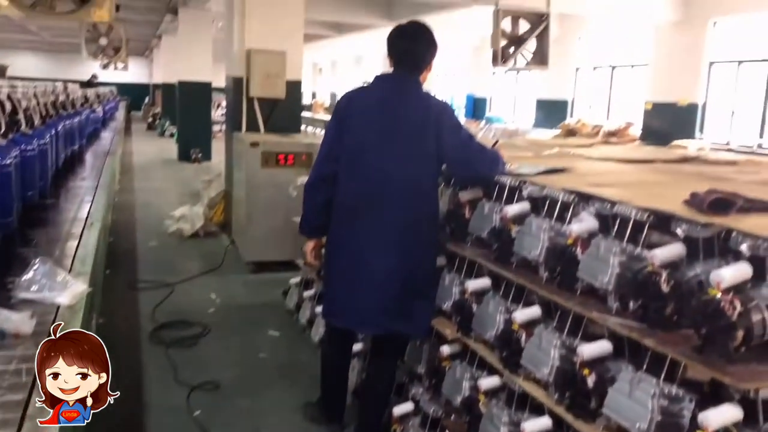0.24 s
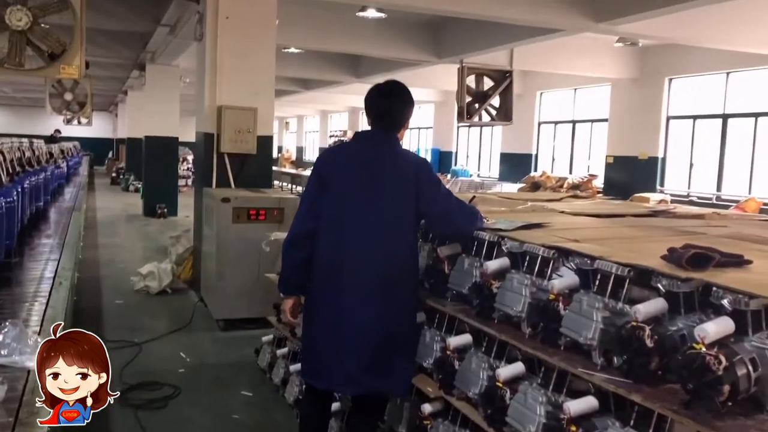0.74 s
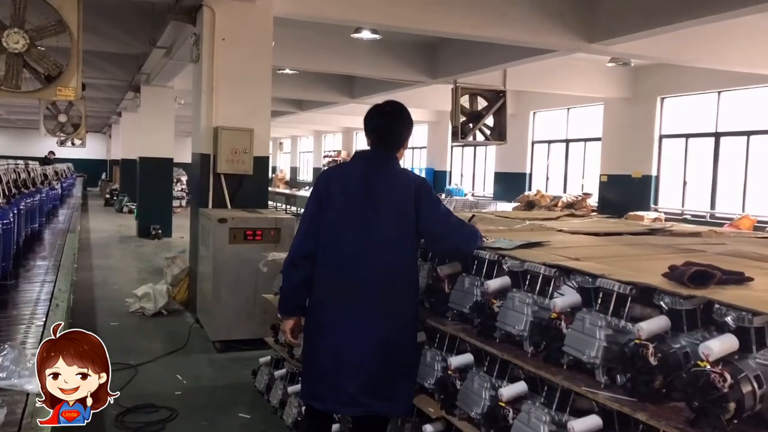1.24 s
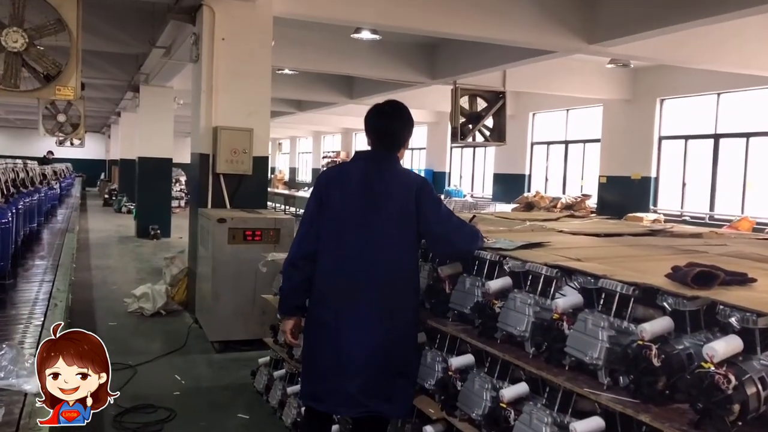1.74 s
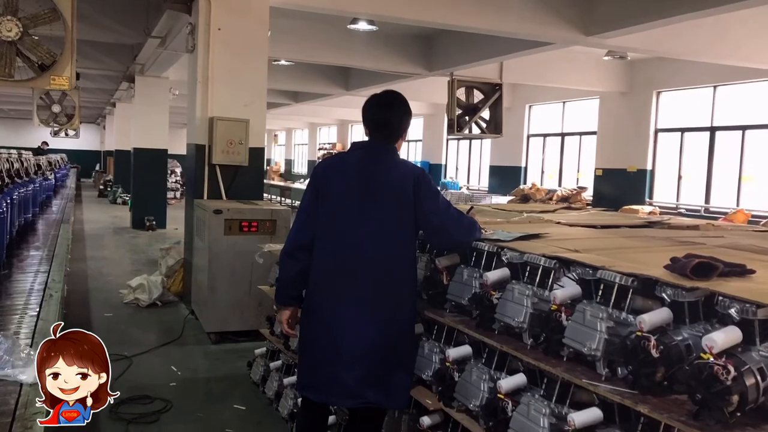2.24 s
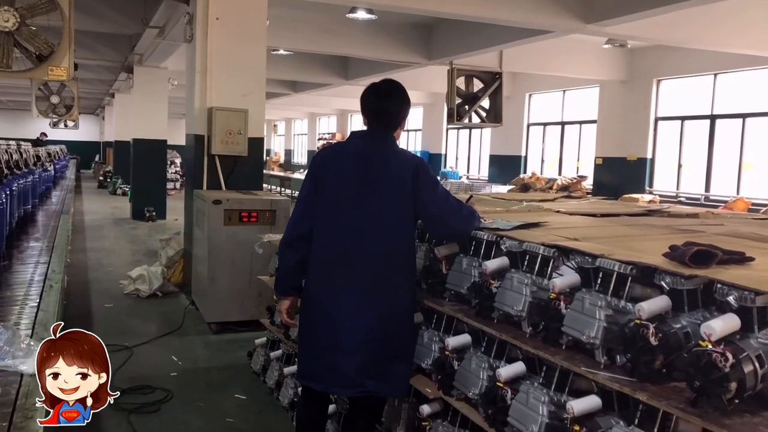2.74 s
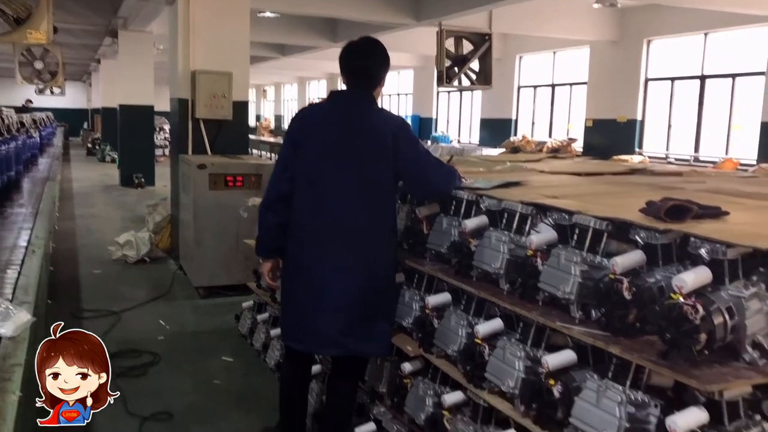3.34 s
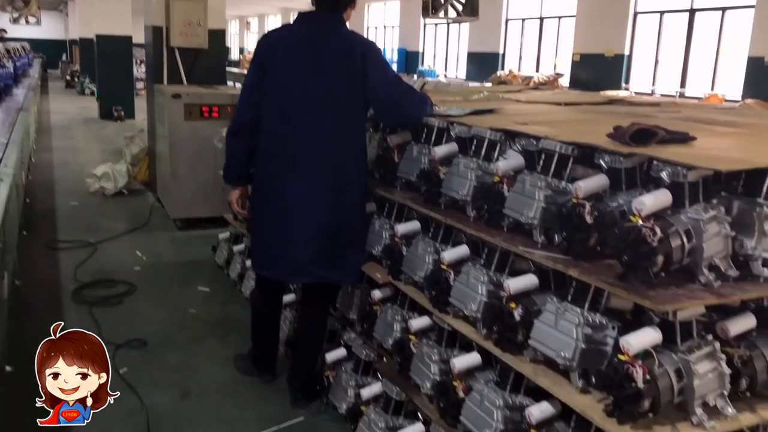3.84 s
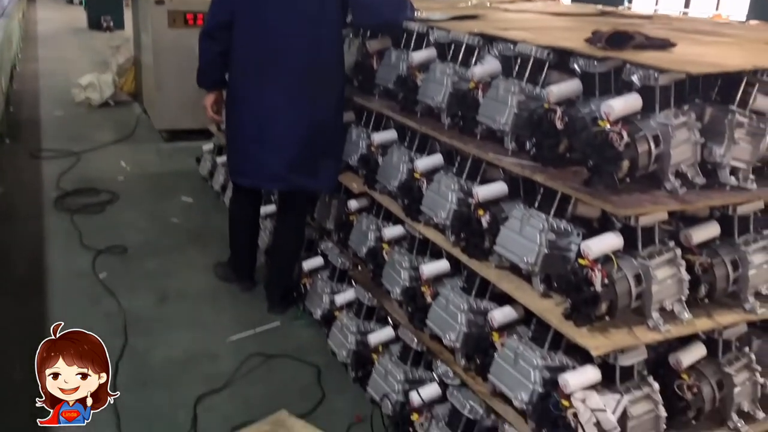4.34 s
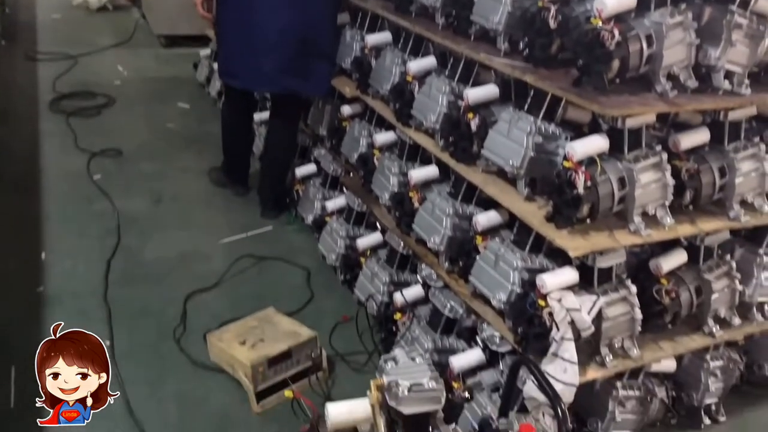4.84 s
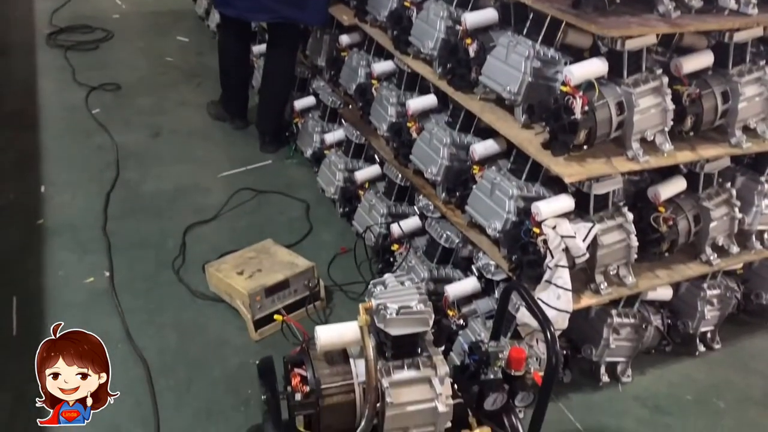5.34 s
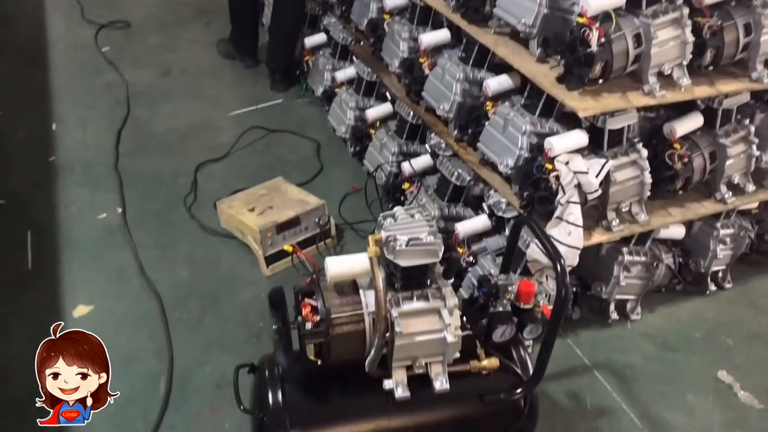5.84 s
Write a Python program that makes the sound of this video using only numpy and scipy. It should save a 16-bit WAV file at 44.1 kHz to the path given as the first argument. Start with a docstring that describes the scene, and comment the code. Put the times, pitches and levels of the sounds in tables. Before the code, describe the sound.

From 0 s a small piston compressor is already running at full speed on a hard factory floor, and it never pauses. About forty-three strokes per second fuse into a rough, thumping drone, strongest in the low-mids to around 800 Hz, with raspy air pulses. Over it lies a dense metallic clatter of valve ticks, hiss and ringing casing, with short floor and rack reflections. Thin, very high squeaks flicker in short bursts, mainly between 0.6 and 4 s. The microphone draws slightly away until 3 s; two harder knocks land near 3.1 and 3.3 s. From 3 to 4.5 s it moves in, and by 5 s it looks down on the cylinder head: slightly louder, with altered metallic ringing. The pitch sags almost imperceptibly as load builds. Fan wash, mains hum and a distant motor swelling near 0.3 and 3.5 s stay very faint. It ends still running.

```python
"""First heard: the fast thumping hum and clatter of a small piston air compressor on a factory floor.
The microphone moves closer after about three seconds. Each crank turn drives a stack of hum orders, a rasp
of air-shaped noise through resonators, and valve ticks and hiss that ring the metal casing; some strokes squeak.
Behind: filtered-noise wash of fan and hall, a weak mains tone, a faint far motor as a gliding sine."""
import sys
import numpy as np
from scipy import signal
from scipy.fft import rfft, irfft
from scipy.io import wavfile
from scipy.ndimage import uniform_filter1d

SR = 44100
rng = np.random.default_rng(int(sys.argv[2]) if len(sys.argv) > 2 else 0)


def unload_audio(sound):
    """Save the sound as a 16-bit wav file, at the path given as the first command line argument."""
    columns = np.transpose(np.atleast_2d(sound))
    # keep every value between -1 and 1, then stretch to whole-number steps
    steps = np.round(np.clip(columns, -1, 1) * 32767)
    wavfile.write(sys.argv[1], SR, steps.astype(np.int16))


N = 267951
TIME_S = np.arange(N) / SR

# walk of the microphone: (time [s], nearness [0-1], look down on cylinder head [0-1])
WALK = [(0, 0.3, 0.23), (.8, 0.14, 0.22), (2.9, .05, 0), (3.9, 0.67, 0.3), (4.5, 1, 0.5), (4.9, 0.9, .98)]
# low crank orders heard from far: (order [x crank speed], relative level [dB])
HUM_ORDERS_FAR = [(1, -27.5), (2, -13.5), (3, -40), (4, -18.5), (5, -20.5), (6, -1.5), (7, -6), (8, -5.5),
                  (9, -12), (10, -5.5), (11, -19), (12, -7.5), (13, -22.5), (14, -14.5), (15, -3.5),
                  (16, -6), (17, -11), (18, -1), (19, 0), (20, -12.5), (21, -10)]
# low crank orders heard from near: (order [x crank speed], relative level [dB])
HUM_ORDERS_NEAR = [(1, -26), (2, -13), (3, -27), (4, -19), (5, -18), (6, -2), (7, -5.5), (8, -5), (9, -14),
                   (10, -5), (11, -12), (12, -19.5), (13, -14), (14, -13.5), (15, -2), (16, -2.5),
                   (17, -20), (18, -3), (19, 1.5), (20, -8.5), (21, -6)]
# air pulses that set the phases of the orders: (place [turns], centre [Hz], width [Hz], weight [dB])
AIR_PULSES = [(0.135, 450, 510, -3), (0.183, 1080, 90, -6), (0.461, 580, 170, -3), (0.574, 1400, 70, -22),
              (0.685, 240, 60, 1), (0.821, 490, 670, -11), (0.897, 900, 530, -4), (0.912, 1060, 300, -4)]
# air flow over one turn: (place [turns], hiss [dB], rasp [dB])
AIR_FLOW = [(.02, -11.5, -4.5), (.15, -3, 0.5), (.3, -3.5, 2), (.43, -3.5, 3), (.58, -5.5, -1),
            (.7, -4, -9.5), (.85, -5, -3.5), (.89, -8, -2)]
# air passages rung by the rasp: (centre [Hz], width [Hz], level [dB])
AIR_PASSAGES = [(807, 94, 3.5), (735, 96, -10), (1414, 63, -2.5)]
# cylinder head resonances: (centre [Hz], width [Hz], far level [dB], near level [dB])
HEAD_MODES = [(1042, 20, -10, -28), (1084, 13, -26, -9), (1129, 15, -7.5, -37), (1216, 14, -9.5, -21),
              (1259, 38, -9, -8.5), (1392, 38, -12, -12.5), (1476, 20, -20, -16.5), (1554.6, 40, -8.5, -5),
              (2172, 30, -31, -18)]
# hall standing waves crossed by the microphone: (time [s], centre [Hz], peak or dip [dB])
STANDING_WAVES = [(.1, 259, -2.5), (.1, 842, 3.5), (.15, 678, -9.5), (2.2, 1504, 14), (3.05, 651, -4),
                  (3.1, 1565, -5.5), (3.2, 312, -7.5), (4.4, 518, -10), (4.199, 362, 3.5), (6, 436, -4.5)]
# valve and piston ticks: (place [turns], level before scatter [dB])
VALVE_TICKS = [(0.87, -0.5), (.905, 2), (0.944, 0), (0.981, -2), (.03, 6), (0.131, -2.5), (.3, -1),
               (.72, -1)]
# harder piston knocks: (time [s], level [dB])
PISTON_KNOCKS = [(3.145, 8), (3.306, 6)]
# broad clatter spectrum: (frequency [Hz], far density [dB per Hz], near density [dB per Hz])
CLATTER_SPECTRUM = [(404, -10.5, -24), (1100, -2, -4), (1620, 2, 0.5), (2150, -1.5, 0), (2940, -3, -2.5),
                    (4080, 4, 3), (4650, -1.5, 0), (6400, -1.5, -1.5), (8500, -1.5, -2), (9700, -7, -4.5),
                    (13000, -8.5, -5), (15800, -6.5, -2.5)]
# casing modes: (centre [Hz], width [Hz], far lift [dB], near lift [dB])
CASING_MODES = [(3120, 46, 3, 6), (3560, 87, 1.5, 7.5), (4090, 38, -5, 7.5), (5330, 64, 7, 0),
                (5970, 78, 9, 9), (6640, 85, -4.5, 8.5), (6710, 39, 11, 6), (7910, 40, 8, 1),
                (9140, 130, 7, 6.5), (9200, 53, -4, -3), (10100, 90, 5, 4.5), (11400, 130, 7.5, -3),
                (14400, 400, 6, 1.5)]
# reeds and rubbing parts, rung once a turn:
# (place [turns], decay length [turns], centre [Hz], width [Hz], far level [dB], near level [dB])
REED_RINGS = [(0.8, 0.097, 5330, 123, -12, -15.5), (.87, 0.086, 6880, 77, -11.5, -21.5),
              (.865, 0.21, 9060, 1200, -20.5, -10.5), (0.5, 0.17, 9540, 57, -16, -26),
              (.93, 0.12, 4060, 270, -22, -18.5), (.88, 0.16, 6300, 360, -19, -15.5),
              (0.03, 0.13, 7900, 45, -30, -11.5), (0.02, 0.22, 3610, 44, -18.5, -14),
              (.87, 0.086, 10900, 2000, -18.5, -18)]
# spells of strong valve squeak: (start [s], end [s])
SQUEAK_SPELLS = [(0.619, 0.69), (.81, .89), (1.33, 1.4), (1.8, 1.95), (2.0, 2.2), (2.3, 2.54), (2.62, 2.77),
                 (2.9, 3), (3.22, 3.2), (3.82, 4)]
# fan and hall spectrum: (frequency [Hz], density [dB per Hz])
WASH_SPECTRUM = [(20, -22), (32, -12), (55, 3.5), (100, -0.5), (130, 0.5), (260, 2), (400, 3.5),
                 (550, -1.5), (1000, 4), (2000, -4), (6000, -11), (16000, -37)]
# far motor: (time of top speed [s], top frequency [Hz], level at top speed [dB])
FAR_MOTOR_RUNS = [(.3, 272, -40), (3.521, 256.6, -36)]

# crank slows steadily as the tank fills
START_TURN, START_TURNS_PER_S, SAG_TURNS_PER_S2 = .041, 43.599, .0545
LOAD_S = 2.3  # time constant of the pump load
# base level, rise at full nearness, rise at full load
PUMP_DB, PUMP_NEAR_DB, PUMP_LOAD_DB = -16.5, 2.5, 1.3
CLATTER_DB, CLATTER_NEAR_DB, CLATTER_LOAD_DB = -22.5, 0.5, 2.06
# slope of the higher orders; they also grow with load
UPPER_HZ, UPPER_DB, UPPER_DB_PER_OCTAVE, UPPER_LOAD_DB = 944, -23, -10, 6
NODE_S, NODE_HZ = 0.66, 25.3  # extent of a standing wave to 1/e of its dB
# squeak levels before uneven strokes and mix; faint squeaks come by chance around a centre time
STRONG_SQUEAK_DB, FAINT_SQUEAK_DB = -32.5, -34.5
FAINT_SQUEAK_S, FAINT_SQUEAK_SPREAD_S = 2.3, 1.8
MOTOR_OCTAVES_PER_S, MOTOR_FADE_DB_PER_S = .5, 16
MAINS_HZ, EDGE_HZ = 100, 15780


def amp(db):
    """Decibels to gain."""
    return 10 ** (np.asarray(db) / 20)


def unit(x):
    """Scales to rms 1."""
    return x / np.sqrt(np.mean(x ** 2) + 1e-20)


def curve(rows, column=1):
    """One column of a time table at every sample."""
    rows = np.asarray(rows)
    return np.interp(TIME_S, rows[:, 0], rows[:, column])


def colour(rows, hz, column=1):
    """One column of a spectrum table as gain at hz, interpolated over log frequency."""
    rows = np.asarray(rows)
    return amp(np.interp(np.log(hz + 1), np.log(rows[:, 0]), rows[:, column]))


def drift(rate_hz):
    """Random wander: low-passed noise, scaled to rms 1 over about 20 s."""
    count, grid_hz = 4096, 200
    hz = np.fft.rfftfreq(count, 1 / grid_hz)
    spectrum = rfft(rng.standard_normal(count)) / (1 + (hz / rate_hz) ** 2)
    slow = unit(irfft(spectrum))
    return np.interp(TIME_S * grid_hz, np.arange(len(slow)), slow)


def resonate(x, hz, width_hz):
    """One-pole complex resonance of about gain 1 at its centre."""
    r = np.exp(-np.pi * width_hz / SR)
    return 2 * signal.lfilter([1 - r], [1, -r * np.exp(2j * np.pi * hz / SR)], x).real


def steady(x, firmness):
    """Self-limiting vibration: evens out power smoothed over turns."""
    turn_samples = int(SR / np.mean(speed_turns_per_s()))
    power = uniform_filter1d(uniform_filter1d(x ** 2, turn_samples), turn_samples)
    return unit(x / (abs(power) + 1e-12) ** (firmness / 2))


def speed_turns_per_s():
    """Crank speed at every sample, falling linearly."""
    return START_TURNS_PER_S - SAG_TURNS_PER_S2 * TIME_S


def air_flow(turns, column):
    """Gain of the air flow at the crank's present place."""
    rows = np.asarray(AIR_FLOW)
    return amp(np.interp(turns, rows[:, 0], rows[:, column], period=1))


def pass_times_s(turns, place):
    """Times at which the crank passes one place in its turn."""
    whole_turns = np.arange(np.ceil(turns[0] - place), turns[-1] - place)
    return np.interp(whole_turns + place, turns, TIME_S)


def clicks(times_s, sizes):
    """Train of single-sample clicks."""
    samples = np.clip(np.round(times_s * SR).astype(int), 0, N - 1)
    return np.bincount(samples, sizes, N)


def order_gains(low, column, count=55):
    """Low orders from their table; higher ones from a falling slope plus cylinder head resonances."""
    hz = np.arange(len(low) + 1, count + 1) * np.mean(speed_turns_per_s())
    slope = amp(UPPER_DB + UPPER_DB_PER_OCTAVE * np.log2(hz / UPPER_HZ))
    rung = sum(amp(row[column + 1]) / (1 + (2 * (hz - row[0]) / row[1]) ** 2) for row in HEAD_MODES)
    return np.concatenate([amp(np.transpose(low)[1]), np.hypot(slope, rung)])


def standing_wave_gain(hz):
    """Gain of one tone over time as the microphone crosses standing waves near its frequency."""
    t = TIME_S[::SR // 100]
    gain_db = sum(db * np.exp(-((t - s) / NODE_S) ** 2 - ((hz - centre) / NODE_HZ) ** 2)
                  for s, centre, db in STANDING_WAVES)
    return np.interp(TIME_S, t, amp(gain_db))


def hum(turns, near, load, wander_db=3.4, shake_db=0.17, wobble_turns=0.00082,
        beat_hz=41.0, beat_depth=0.051, beat_width_hz=90, beat_slip_rad=1.0):
    """Air pulses repeat each turn, forming crank orders whose balance shifts with listening place."""
    far_gain, near_gain = order_gains(HUM_ORDERS_FAR, column=1), order_gains(HUM_ORDERS_NEAR, column=2)
    order = np.arange(1, len(far_gain) + 1)
    hz = order * np.mean(speed_turns_per_s())
    # each order takes its phase from the pulses near its frequency
    pulse_sum = sum(amp(db) / (1 + (2 * (hz - centre) / width) ** 2) * np.exp(-2j * np.pi * order * place)
                    for place, centre, width, db in AIR_PULSES)
    phase_rad = np.angle(pulse_sum)
    crank_rad = 2 * np.pi * (turns + wobble_turns * drift(rate_hz=33))
    # orders near the first air passage flutter
    beating = np.cos(2 * np.pi * beat_hz * TIME_S + beat_slip_rad * drift(rate_hz=0.81))
    depth = beat_depth / (1 + (2 * (hz - AIR_PASSAGES[0][0]) / beat_width_hz) ** 2)
    out = np.zeros(N)
    for k, f, far, close, lag, share in zip(order, hz, far_gain, near_gain, phase_rad, depth):
        # short waves shift most as the microphone sways
        wander = amp(wander_db * k / len(order) * drift(rate_hz=0.091))
        strain = amp(UPPER_LOAD_DB * (load - 1)) if k > len(HUM_ORDERS_FAR) else 1
        place_gain = far + (close - far) * near
        gain = place_gain * strain * standing_wave_gain(f) * wander * (1 + share * beating)
        out += gain * np.cos(k * crank_rad + lag)
    levelled = unit(out / np.sqrt(uniform_filter1d(out ** 2, SR // 2)))
    return levelled * amp(shake_db * drift(rate_hz=24))


def rasp(turns, rebound=0.45, firmness=0.92):
    """Gusts of turbulent air ring the pump passages."""
    gusts = rng.standard_normal(N) * air_flow(turns, column=2)
    # a full stroke leaves less air for the next
    gusts = gusts - rebound * np.interp(turns - 1, turns, gusts, left=0)
    air = sum(amp(db) * resonate(resonate(gusts, hz, width), hz, width * 4)
              for hz, width, db in AIR_PASSAGES)
    return steady(air, firmness)


def clatter(turns, above, hiss_db=-.5, casing_db=-1.0, stroke_db=0.77):
    """Ticks and hiss pass the casing and the reeds ring; the mix follows the view of the cylinder head."""
    hiss = unit(rng.standard_normal(N) * air_flow(turns, column=1))
    drive = ticks(turns) + amp(hiss_db) * hiss
    body = unit((1 - above) * casing(drive, column=1) + above * casing(drive, column=2))
    reeds = sum(amp(far_db + (near_db - far_db) * above) * ring(turns, place, length, hz, width)
                for place, length, hz, width, far_db, near_db in REED_RINGS)
    return (amp(casing_db) * body + reeds) * amp(stroke_db * drift(rate_hz=13))  # some strokes rattle harder


def ticks(turns, jitter_s=.00004, scatter_db=3.5, ring_s=0.0014, hall_db=-4, hall_s=0.038):
    """Ticks and knocks rattle briefly through metal and are thrown back by floor and racks."""
    t = np.arange(SR // 4) / SR
    knock_s, knock_db = np.transpose(PISTON_KNOCKS)
    trains = [clicks(knock_s, amp(knock_db))]
    for place, db in VALVE_TICKS:
        times_s = pass_times_s(turns, place)
        late, strength = rng.uniform(-1, 1, (300, 2))[:len(times_s)].T
        trains.append(clicks(times_s + 2 * jitter_s * late, amp(db + scatter_db * strength)))
    out = np.zeros(N)
    for train in trains:
        rattle, echoes = rng.standard_normal((2, len(t)))
        response = unit(rattle * np.exp(-t / ring_s)) + amp(hall_db) * unit(echoes * np.exp(-t / hall_s))
        out += signal.oaconvolve(train, response)[:N]
    return unit(out)


def casing(x, column, size=8192):
    """Minimum-phase filter of the metal casing: broad spectrum with ringing modes on top."""
    hz = np.fft.rfftfreq(size, 1 / SR)
    modes = sum((amp(row[column + 1]) - 1) / (1 + 2j * (hz - row[0]) / row[1]) for row in CASING_MODES)
    log_gain = np.log(colour(CLATTER_SPECTRUM, hz, column=column) * abs(1 + modes))
    circle = np.concatenate([log_gain, log_gain[-2:0:-1]])
    response = np.fft.ifft(np.exp(np.conj(signal.hilbert(circle)))).real
    return unit(signal.oaconvolve(x, response[:size // 2])[:N])


def ring(turns, place, length_turns, hz, width_hz, firmness=0.49):
    """Noise chatter starts at one place in each turn, decays and rings one resonance."""
    chatter = np.exp(-((turns - place) % 1) / length_turns) * rng.standard_normal(N)
    return steady(resonate(resonate(chatter, hz, width_hz), hz, width_hz * 4), firmness)


def squeak(turns, hz=12200, width_hz=430, place=.875, length_turns=0.17, uneven_db=3.3):
    """For a few strokes at a time the outlet valve gives a very short, high squeak."""
    strong = amp(STRONG_SQUEAK_DB) * sum((TIME_S > start) & (TIME_S < end) for start, end in SQUEAK_SPELLS)
    likely = np.exp(-((TIME_S - FAINT_SQUEAK_S) / FAINT_SQUEAK_SPREAD_S) ** 2 / 2)
    faint = amp(FAINT_SQUEAK_DB) * (drift(rate_hz=7) > 0) * likely
    spells = uniform_filter1d(np.maximum(strong, faint), size=400)
    return ring(turns, place, length_turns, hz, width_hz) * spells * amp(uneven_db * drift(rate_hz=20))


def wash(patch_db=1.5):
    """Fan air and hall rumble: coloured noise with a wandering level."""
    spectrum = rfft(rng.standard_normal(N)) * colour(WASH_SPECTRUM, np.fft.rfftfreq(N, 1 / SR))
    return unit(irfft(spectrum, N)) * amp(patch_db * drift(rate_hz=6.9))


def mains_tone():
    """Steady sine at MAINS_HZ."""
    return unit(np.sin(2 * np.pi * MAINS_HZ * TIME_S))


def far_motor():
    """A soft tone across the hall swells as it winds up and fades as it coasts down."""
    out = np.zeros(N)
    for top_s, top_hz, db in FAR_MOTOR_RUNS:
        away_s = abs(TIME_S - top_s)
        hz = top_hz * 2 ** (-MOTOR_OCTAVES_PER_S * away_s)
        tone = unit(np.sin(2 * np.pi * np.cumsum(hz) / SR))
        out += amp(db - MOTOR_FADE_DB_PER_S * away_s) * tone
    return out


def scene(hum_db=-0.69, rasp_db=-11.0, squeak_db=-1.5, wash_db=-32.0, wash_rise_db=3, mains_db=-53):
    """One crank drives all the compressor's pump and metal sounds; the background is added."""
    turns = START_TURN + np.cumsum(speed_turns_per_s()) / SR
    near, above = (np.clip(curve(WALK, column=k), 0, 1) for k in (1, 2))
    load = 1 - np.exp(-TIME_S / LOAD_S)
    pump_gain = amp(PUMP_DB + PUMP_NEAR_DB * near + PUMP_LOAD_DB * load)
    pump = pump_gain * (amp(hum_db) * hum(turns, near, load) + amp(rasp_db) * rasp(turns))
    clatter_gain = amp(CLATTER_DB + CLATTER_NEAR_DB * near + CLATTER_LOAD_DB * load)
    metal = clatter_gain * clatter(turns, above) + amp(squeak_db) * squeak(turns)
    mains = amp(mains_db) * mains_tone()
    air = amp(wash_db + wash_rise_db * near) * wash()
    return (pump + metal + mains + air + far_motor())[None]


def record(dry):
    """Band limit: linear-phase low-pass at EDGE_HZ."""
    low_pass = signal.firwin(1023, EDGE_HZ, window=("kaiser", 9), fs=SR)
    return signal.oaconvolve(dry, low_pass[None], "same")


dry = scene()
out = record(dry)
unload_audio(out)
```